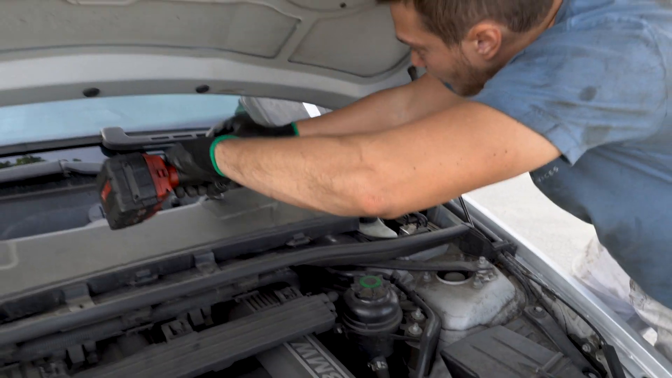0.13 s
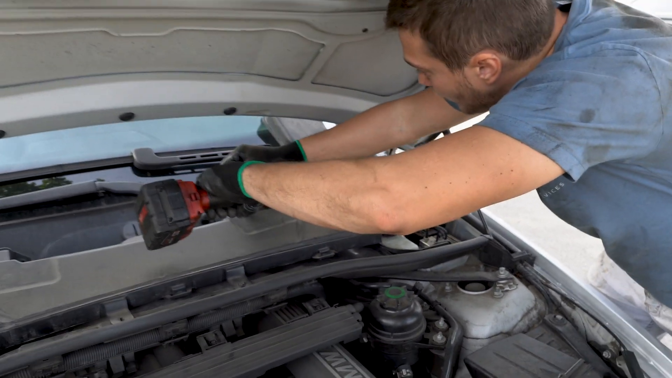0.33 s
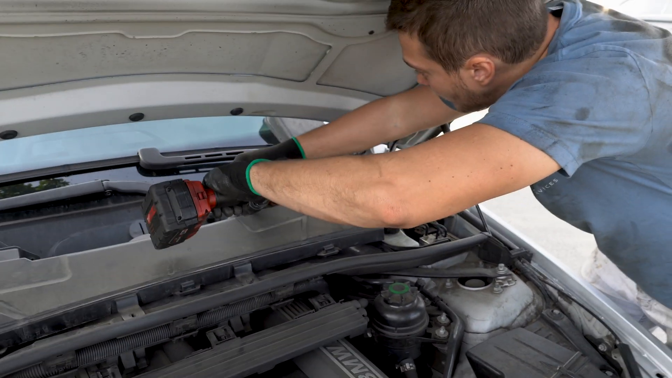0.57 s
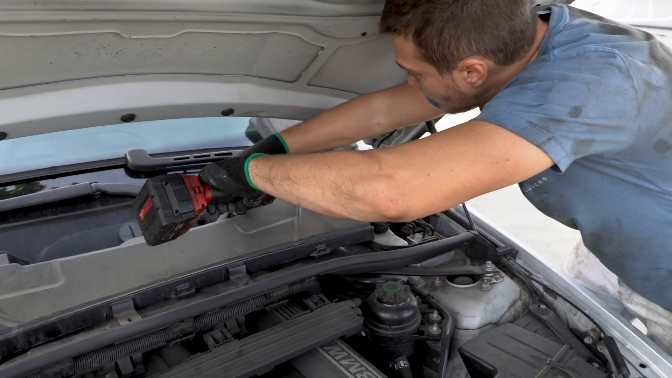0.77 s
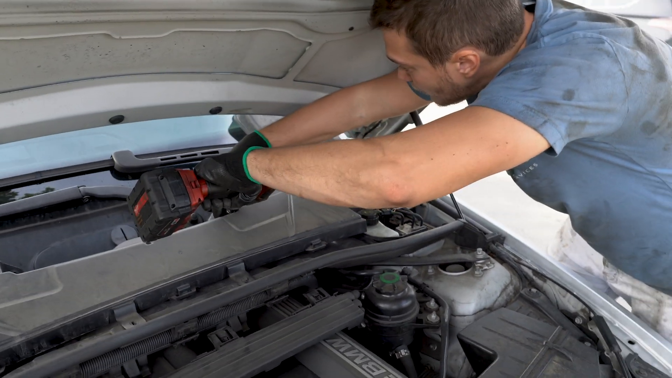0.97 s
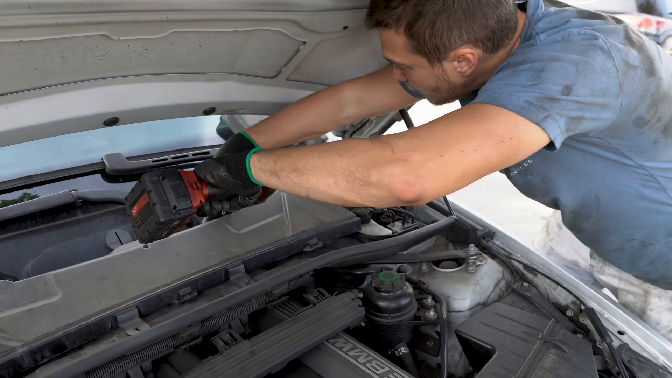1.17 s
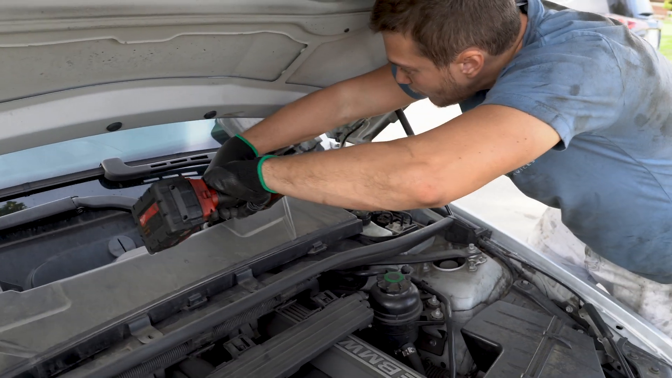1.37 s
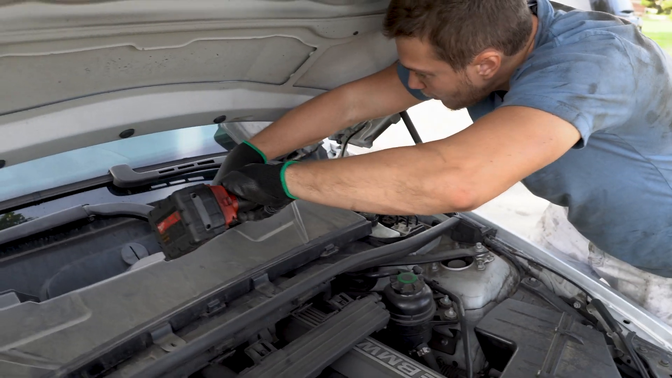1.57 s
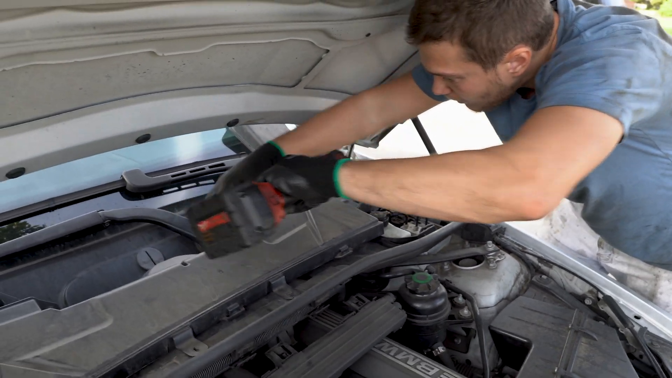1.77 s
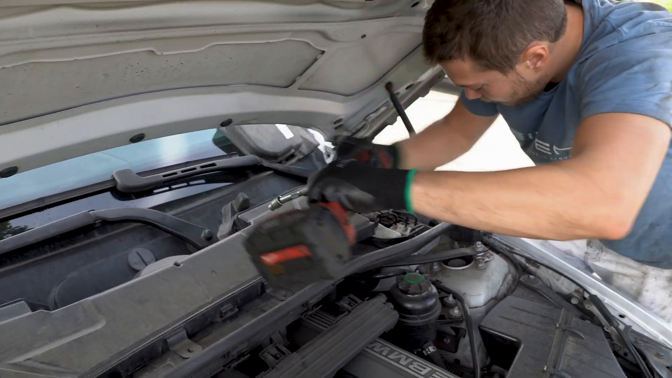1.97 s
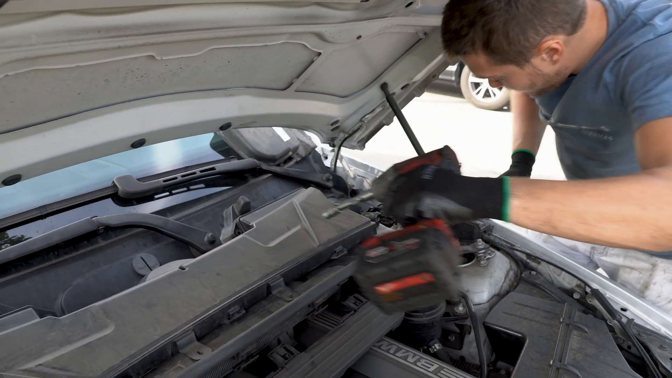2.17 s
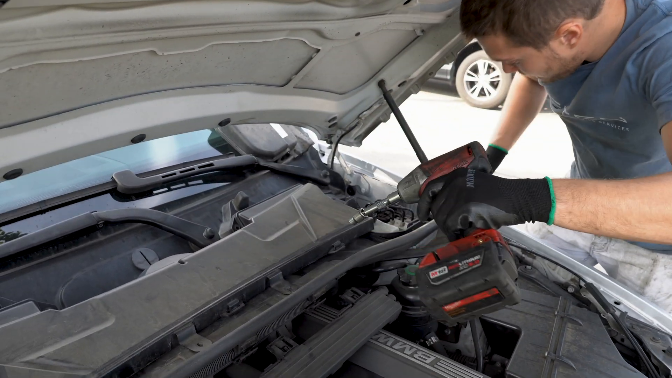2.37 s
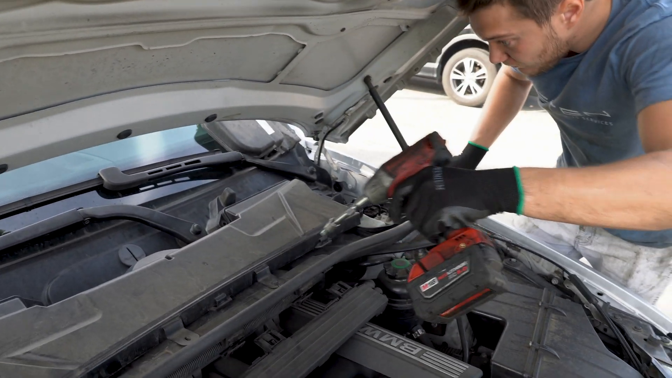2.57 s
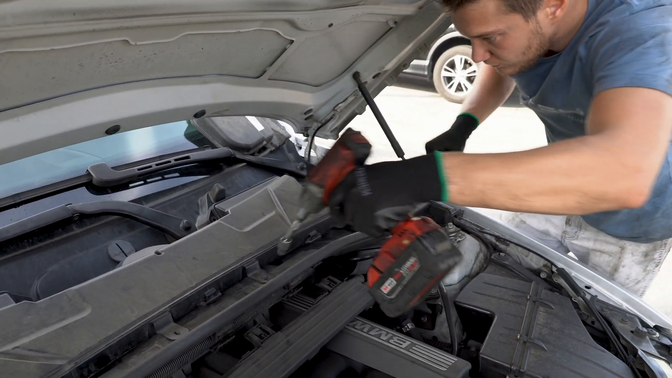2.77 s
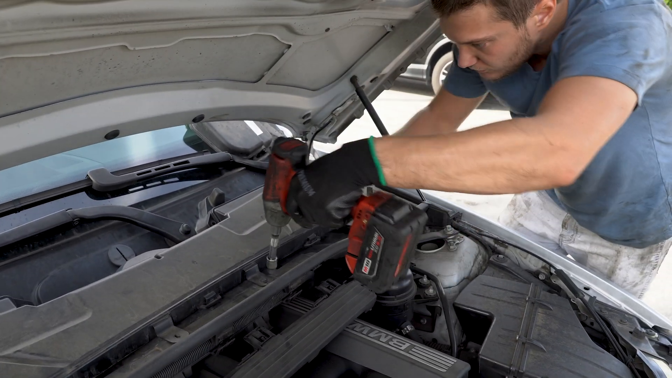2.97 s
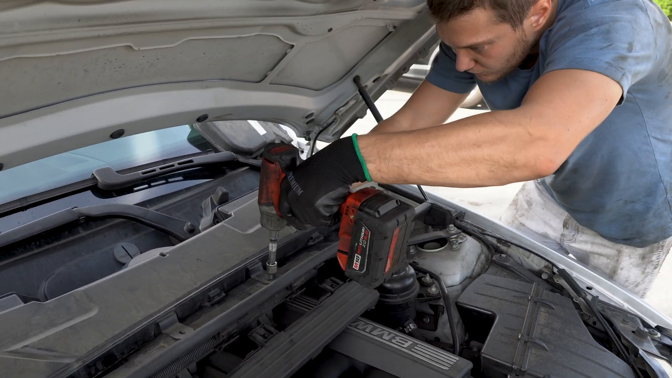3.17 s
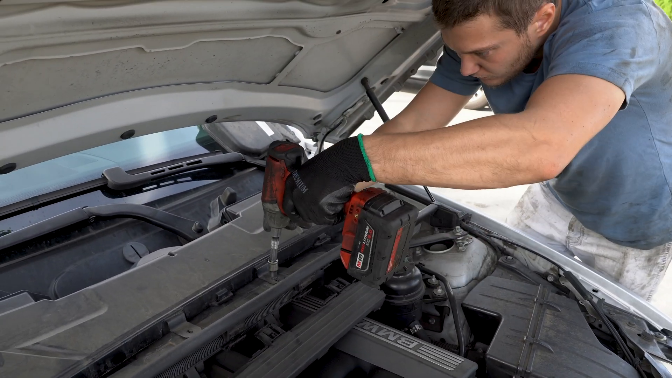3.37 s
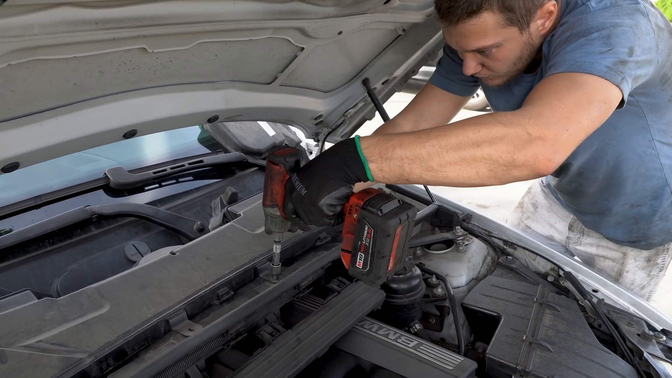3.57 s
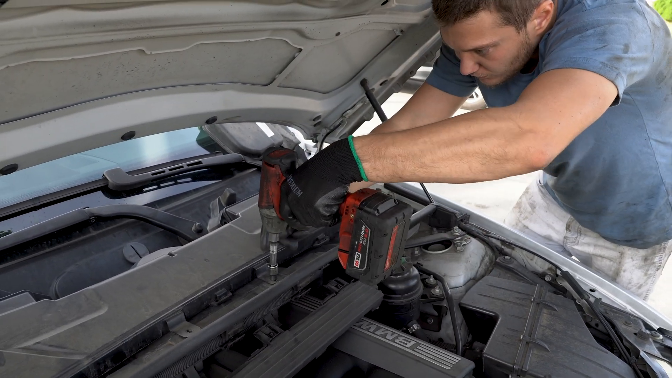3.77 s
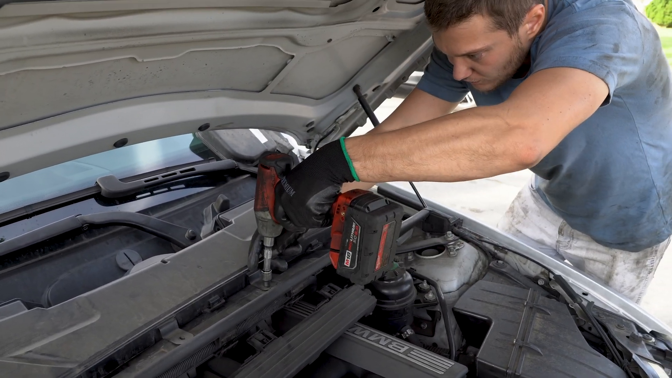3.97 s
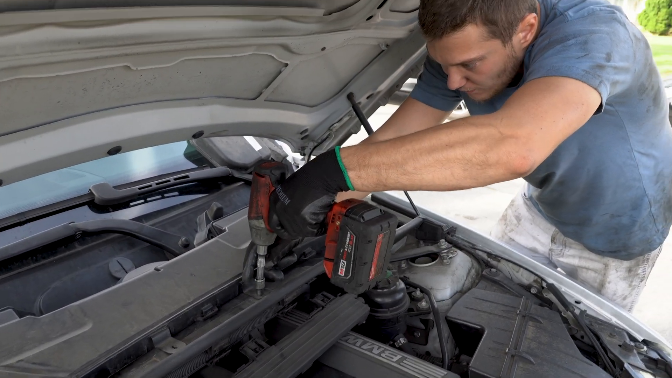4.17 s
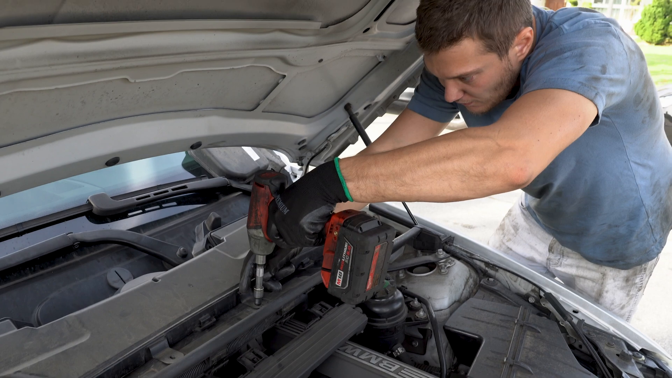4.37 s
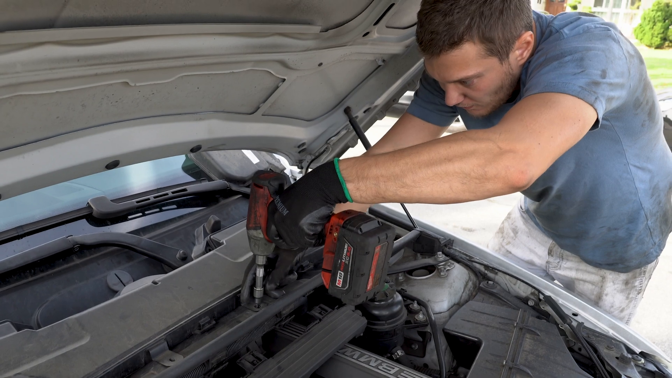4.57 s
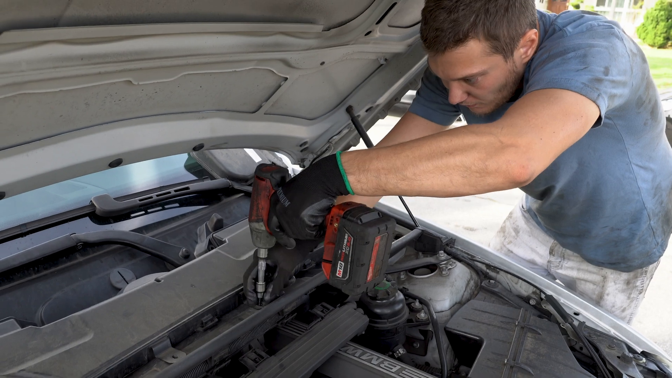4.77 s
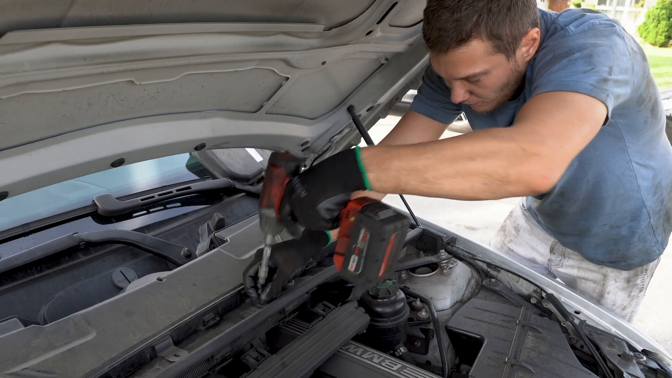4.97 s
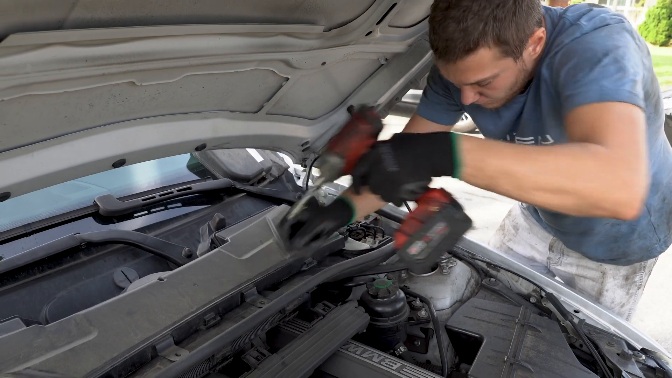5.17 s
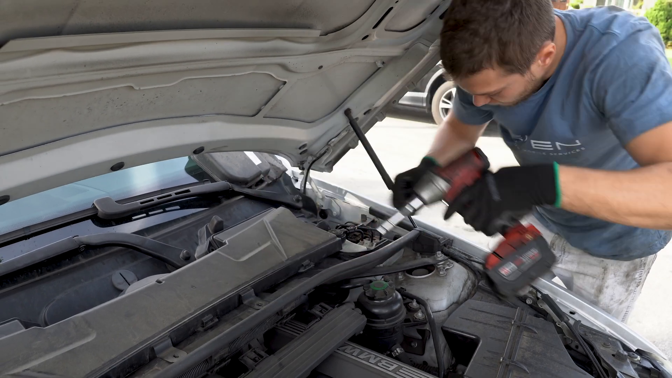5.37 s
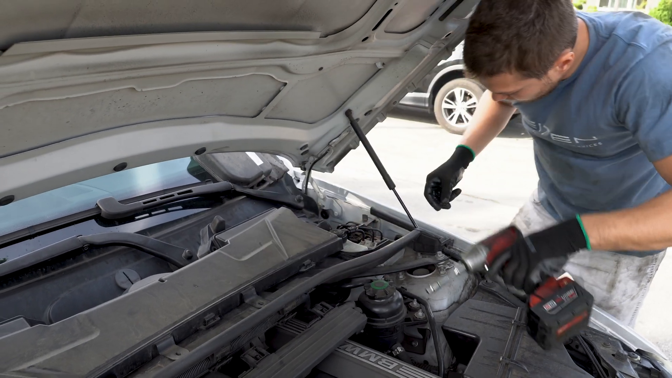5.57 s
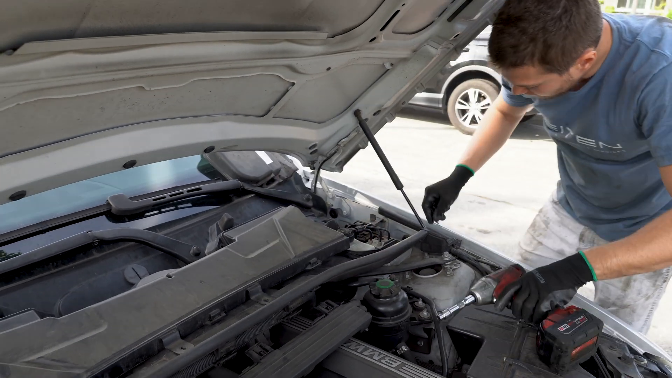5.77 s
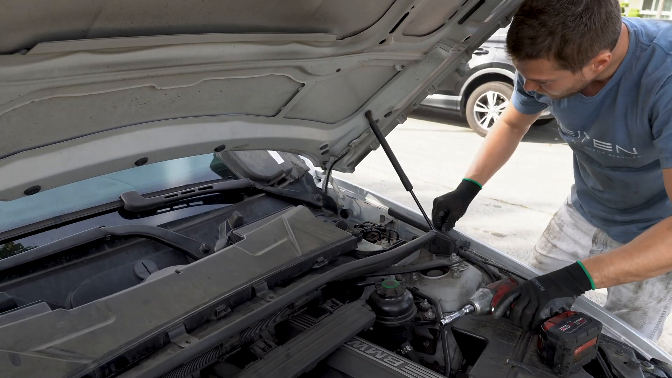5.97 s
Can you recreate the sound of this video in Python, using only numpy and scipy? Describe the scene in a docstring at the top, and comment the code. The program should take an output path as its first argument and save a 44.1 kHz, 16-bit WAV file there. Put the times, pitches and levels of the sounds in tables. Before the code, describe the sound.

A cordless electric ratchet spins out two small bolts in a car engine bay, heard from nearby. Hollow plastic knocks lead into the first whining, rattling run, which speeds up and shakes a cover. In the pause the tool snaps once and its socket clinks on a bolt head. The second run is briefer and opens with a loud metallic clink. Light ticks and sleeve rustles trail off over quiet outdoor rumble and distant hum.

```python
"""Under the open bonnet of a car, a cordless electric ratchet spins out two small bolts.
Its switched motor whistles near 10 kHz, the gears whine and rattle, and the loose bolt drives a plastic
cover into vibration. Impacts excite damped modes: the tool knocks on the cover and snaps once, and its
socket clinks on the bolt heads and ticks on its drive. The engine bay adds short reflections.
Behind lie outdoor rumble, a faint machine hum and the brushing of cloth."""
import sys
import numpy as np
from scipy import signal
from scipy.fft import rfft, irfft, next_fast_len
from scipy.io import wavfile
from scipy.ndimage import uniform_filter1d

SR = 44100
rng = np.random.default_rng(int(sys.argv[2]) if len(sys.argv) > 2 else 0)


def log_audio(samples):
    """Write samples as a 16-bit WAV file to the path given in sys.argv[1]."""
    # one column per channel
    frames = np.atleast_2d(samples).T
    # limit to full scale, then quantise
    limited = np.clip(frames, -1, 1)
    pcm = np.round(limited * 32767).astype(np.int16)
    wavfile.write(sys.argv[1], SR, pcm)


N = 265570
TIME = np.arange(N) / SR

# one run per bolt, levels referred to full speed and the moment of release:
# pull t/s, release t/s, cover level/dB, its drift/(dB/s), rattle level/dB, whine level/dB, whistle level/dB
BOLT_RUNS = [(0.828, 1.472, -29.5, 0.5, -38.7, -39.5, -35.3), (4.327, 4.785, -38.5, -18, -35, -39, -29.5)]
# the motor speeds up as the trigger goes deeper or the bolt frees: t/s, new electrical rate/Hz, lag/s
MOTOR_STEPS = [(.838, 157, .024), (1.165, 240, .04), (1.275, 303, .06), (4.331, 272, .028),
               (4.41, 328, .18)]
# whistle lines: offset from the switching tone/electrical rate, level/dB, wavering/dB
WHISTLE_SIDEBANDS = [(-4, -20.5, 3), (-2, 0, 1.3), (1, -25, 2), (2, -10, 3.5), (4, -31, 2)]
# motor and gear-mesh tones: f/electrical rate, level/dB
WHINE_ORDERS = [(3.15, -7), (6, -2), (7, -9), (8, 0), (9.45, -2), (10, -1), (12.6, -5), (14, -10),
                (15.75, -9), (18.9, -7), (22, -13), (25.2, -10)]
# peaks and a narrow notch that the whine and whistle glide through: f/Hz, half width/Hz, gain/dB
PEAKS_AND_NOTCH = [(1940, 80, 3), (2400, 120, 6), (2950, 90, 4), (3220, 90, 5), (3900, 70, 5),
                   (8780, 70, 8), (10570, 22, -12)]
# spectral densities of gear rattle, shaken cover and outdoor rumble: f/Hz, relative level/dB
RATTLE_SPECTRUM = [(200, -25.5), (700, -5.5), (1450, 0), (1700, -2.5), (2300, -4.5), (3000, 1),
                   (3600, -4.5), (5800, -7), (7000, -13), (8000, -8.5), (9000, -5), (11000, -17.5),
                   (14000, -17), (16000, -30)]
COVER_SPECTRUM = [(70, -29), (120, -4.5), (160, 8), (235, -2), (330, -8), (480, 0), (680, -16), (950, -8),
                  (1450, -22.5), (2200, -20.5), (5000, -48)]
AIR_SPECTRUM = [(15, -0.5), (28, -4), (44, -9), (100, -9), (200, -18.5), (330, -23.5), (500, -22),
                (1030, -25), (2530, -37.5), (8650, -50.5), (11000, -57.5), (16000, -63.5)]
# normal modes of plastic cover, socket and tool housing: f/Hz, level/dB, t60/s
COVER_MODES = [(156.8, 6, 0.097), (300, -2.5, 0.12), (371, -2, 0.054), (445, -1.5, 0.097),
               (638, 2.5, 0.043), (722, -2.5, 0.065), (866, -2, 0.069), (1024, -4, 0.051),
               (1123, -4, 0.033), (1450, -8, 0.045)]
SOCKET_MODES = [(168, 2, .18), (440, -4.5, 0.095), (511.4, -2, 0.18), (842, -9.5, 0.13), (1112, -5, 0.06),
                (1358, -5.5, .07), (1502, -1, 0.044), (1990, -12, 0.094), (2128, 0.5, 0.037),
                (2390, -4, 0.064), (2828, 0.5, .07), (2980, -6.5, 0.077), (3570, -2.5, .06),
                (3960, -10.5, .06), (4425, -12, 0.078)]
HOUSING_MODES = [(321, -6.5, 0.16), (543, -32, 0.131), (830, -16, .18), (915, -8, 0.3), (1133, -4, 0.071),
                 (1665, -5, .12), (1990, -3, 0.2), (2080, 0.5, 0.18), (2340, -6, 0.24), (2960, 6, 0.11),
                 (3030, -5, 0.161), (3580, 8.5, 0.07), (3960, -7.5, 0.139), (4770, -8, 0.11)]
# the four bands of a blow (thud, body, crack, tick): lower f/Hz, upper f/Hz
BLOW_BANDS = [(110, 380), (380, 1600), (1600, 5500), (5500, 16000)]
# tool and bolt strike the cover: t/s, body level/dB, relative thud/dB, relative crack/dB, cutoff f/Hz
COVER_KNOCKS = [(0.188, -24.5, -13, -19, 10000), (0.288, -49, -12, -28, 1100),
                (0.325, -33.5, -8.5, -30, 7000), (0.367, -42, -5, -34, 980), (0.4285, -25, -13, -20, 9000),
                (0.463, -24.5, -1, -16, 9800), (0.8317, -24, -1, -5, 13500),
                (0.8645, -23.5, -4, -7.5, 14000), (0.987, -38, 7, -22, 2520),
                (1.111, -31.5, -1.5, -14, 2480), (1.231, -38.5, 7.5, -12, 2500),
                (1.301, -37.5, 5, -3.5, 2510), (1.383, -32.5, -8, -14, 2500), (1.44, -28, 2.5, -17, 2500),
                (3.0585, -50.5, -9, -10.5, 4970), (3.266, -51, -12, -8.5, 6040),
                (5.802, -46, -10, -6.5, 7960), (5.829, -33.5, -1, -18, 754)]
# socket strikes bolt head: t/s, crack level/dB, relative thud/dB, relative tick/dB, t60/s, cutoff f/Hz
SOCKET_CLINKS = [(1.505, -41, 0.5, -25, 0.077, 9050), (1.532, -53, 12.5, 10, 0.033, 13200),
                 (1.56, -46, -2.5, 0.5, 0.077, 12100), (3.554, -29, -23, -16.5, 0.041, 7340),
                 (3.5819, -38.5, -4, -23, 0.054, 6000), (3.5921, -38, -5.5, -17, 0.021, 7200),
                 (3.601, -29, -9, -18.5, 0.031, 7300), (3.688, -43.5, 16.5, -12, .13, 9000),
                 (3.6977, -35, 4, 1.5, 0.049, 7440), (4.377, -22, -4, -3.5, 0.099, 14520),
                 (4.384, -16.5, -12, -6.5, 0.044, 11300), (4.4059, -30, 1.5, -4.5, .016, 9450),
                 (4.997, -52.5, -2.5, -9, 0.022, 7500)]
# catch, blow and rebound of a metal snap in the tool: t/s, level/dB, t60/s
SNAP_BLOWS = [(2.6508, -41, 0.022), (2.655, -21, .15), (2.6855, -31, 0.098)]
# light contacts from play in the drive: t/s, level/dB
DRIVE_TICKS = [(0.091, -60), (0.777, -58), (2.262, -55.5), (4.076, -62.5), (4.875, -52), (5.037, -58),
               (5.884, -65)]
# partials of a distant machine: f/Hz, rms level/dB
HUM_PARTIALS = [(86.3, -55.5), (172.6, -68), (260, -67.5), (345, -63), (431.5, -72.5), (520, -75),
                (866, -73)]
# gloves and sleeves brush past: t/s, half length/s, level/dB
CLOTH_BRUSHES = [(0.023, 0.03, -60), (1.78, 0.053, -63.5), (2.463, 0.36, -66.5), (4.998, 0.11, -60.5),
                 (5.36, 0.11, -61.5), (5.916, 0.12, -64)]

SWITCHING_HZ, FULL_SPEED_HZ = 9942, 300  # full speed is an electrical rate
COAST_S, COAST_SLOWING = .066, .5  # run-on after release, share of speed lost in it
START_S, STOP_S, WHISTLE_ATTACK_S = 0.013, 0.022, 0.012  # fades of the gears and cover; whistle onset
SHAKE_RISE_DB, RATTLE_RISE_DB, WHISTLE_RISE_DB = 13.5, 1, 6.5  # per doubling of speed
STRAIN_RATTLE_DB, STRAIN_WHINE_DB = 5, -24  # under strain the teeth chatter in their play, and tones fade
WHINE_DB_PER_S = 13.5  # the gear tones come through as the thread frees


def ratchet(pull, release, shake_db, drift_db_per_s, rattle_db, whine_db, whistle_db):
    """Forced vibration follows the motor's speed; on release the whistle stops while the gears coast."""
    asked_hz, hz = motor_speed(pull, release)
    cycles = np.cumsum(hz * (1 + .002 * walk(25))) / SR
    powered = (TIME > pull) & (TIME < release)
    age = np.maximum(TIME - pull, 0)
    to_go = release - np.clip(TIME, pull, release)
    turning = np.clip(age / START_S, 0, 1) * np.clip((release + COAST_S - TIME) / STOP_S, 0, 1)
    speed_oct, asked_oct = np.log2(np.maximum([hz, asked_hz], 1) / FULL_SPEED_HZ)
    strain = (asked_hz - hz) / FULL_SPEED_HZ

    def at_level(layer, db):
        return layer / layer[powered].std() * undb(db)

    cover = at_level(cover_shaking(hz), shake_db + SHAKE_RISE_DB * speed_oct - drift_db_per_s * to_go)
    rattle = gear_rattle(hz, cycles, swell_db=2.8, reduction=20.5)
    rattle = at_level(rattle, rattle_db + RATTLE_RISE_DB * asked_oct + STRAIN_RATTLE_DB * strain)
    whine = at_level(gear_whine(hz, cycles), whine_db - WHINE_DB_PER_S * to_go + STRAIN_WHINE_DB * strain)
    whistle = at_level(motor_whistle(hz, cycles), whistle_db + WHISTLE_RISE_DB * asked_oct)
    whistle *= 1 - np.exp(-age / WHISTLE_ATTACK_S)
    return (cover + rattle + whine) * turning + whistle * uniform_filter1d(powered * 1., size=400)


def motor_speed(pull, release):
    """First-order lag: the rate reached trails each step in the rate asked for, and falls after release."""
    asked_hz, hz, last_hz = np.zeros(N), np.zeros(N), 0
    for start, new_hz, lag in MOTOR_STEPS:
        if pull - .1 < start < release:
            asked_hz += (new_hz - last_hz) * (TIME > (start if last_hz else pull))
            hz += (new_hz - last_hz) * (1 - np.exp(-np.maximum(TIME - start, 0) / lag))
            last_hz = new_hz
    coasted = np.clip((TIME - release) / COAST_S, 0, 1)
    return uniform_filter1d(asked_hz, size=512), hz * (1 - COAST_SLOWING * coasted ** 2)


def motor_whistle(hz, cycles):
    """Modulation: the switched motor current sings in sidebands that spread as the speed rises."""
    return sum(undb(db + tone_gain_db(SWITCHING_HZ + k * hz) + waver_db * walk(20))
               * np.sin(2 * np.pi * (SWITCHING_HZ * TIME + k * cycles))
               for k, db, waver_db in WHISTLE_SIDEBANDS)


def gear_whine(hz, cycles):
    """Periodic forcing: motor and gear mesh sound at fixed multiples of the speed."""
    return sum(undb(db + tone_gain_db(k * hz) + 2.5 * walk(25)) * np.sin(2 * np.pi * k * cycles)
               for k, db in WHINE_ORDERS)


def tone_gain_db(hz):
    """Frequency response: peaks and a narrow notch make the gliding tones swell and briefly fade."""
    return sum(db * np.exp(-((hz - centre) / width) ** 2) for centre, width, db in PEAKS_AND_NOTCH)


def gear_rattle(hz, cycles, swell_db, reduction):
    """Backlash: teeth click through their play and ring the socket, swelling once per socket turn."""
    teeth = impacts(9 * hz + 200, scatter_db=2.0) + 0.07 * rng.standard_normal(N)
    swell = undb(swell_db * np.cos(2 * np.pi * cycles / reduction) + 0.97 * walk(70))
    response = ring(SOCKET_MODES[3:], np.arange(SR // 10) / SR, longest_t60=.06)
    ringing = signal.fftconvolve(teeth, response)[:N]
    return (colour(teeth, RATTLE_SPECTRUM) + undb(-17) * unit(ringing)) * swell


def cover_shaking(hz):
    """Random impact excitation: the wobbling bolt taps the plastic cover, which rumbles and rings."""
    taps = impacts(0.87 * hz + 50, scatter_db=0)
    rumble = colour(taps + 0.022 * rng.standard_normal(N), COVER_SPECTRUM)
    response = ring(COVER_MODES, np.arange(SR // 5) / SR, longest_t60=0.03)
    ringing = signal.fftconvolve(taps, response)[:N]
    return rumble + undb(-9.5) * unit(ringing)


def cover_knocks(t60=.043, tick_db=-9):
    """Contact shapes the spectrum: a heavy push on the cover adds thud, a hard hit crack and tick."""
    rows = [(start, db + thud, db, db + crack, db + crack + tick_db, t60, cutoff_hz)
            for start, db, thud, crack, cutoff_hz in COVER_KNOCKS]
    return blows(rows, COVER_MODES, dense_db=4, hold=2.23, damping=0.54, rise_s=0.00095, hardness=0.95)


def socket_clinks(body_db=3, body_share=.55):
    """Metal impact: a socket seating firmly adds thud and hollow body, a square hit a bright tick."""
    rows = [(start, db + thud, db + body_db + body_share * thud, db, db + tick, t60, cutoff_hz)
            for start, db, thud, tick, t60, cutoff_hz in SOCKET_CLINKS]
    return blows(rows, SOCKET_MODES, dense_db=2.5, hold=1.23, damping=.4, rise_s=0.00057, hardness=1.4)


def housing_snap(band_db=(-26.5, -9, -1, -3.5), cutoff_hz=9600):
    """Impulse response: the snap and its rebound ring the modes of the tool's housing."""
    rows = [(start, *np.add(db, band_db), t60, cutoff_hz) for start, db, t60 in SNAP_BLOWS]
    return blows(rows, HOUSING_MODES, dense_db=5.5, hold=1.9, damping=0.51, rise_s=0.00022, hardness=4.1)


def drive_ticks(band_db=(1, -4, 0.5, -3), t60=0.038, cutoff_hz=11700):
    """Mechanical clearance: the loose socket strikes its drive with a thin tick."""
    rows = [(start, *np.add(db, band_db), t60, cutoff_hz) for start, db in DRIVE_TICKS]
    return blows(rows, SOCKET_MODES, dense_db=11, hold=1.5, damping=0.54, rise_s=0.00017, hardness=1.7)


def blows(rows, modes, dense_db, hold, damping, rise_s, hardness):
    """Modal superposition: a blow rings the main modes and a dense crowd whose treble dies first."""
    out, t = np.zeros(N + SR), np.arange(SR // 4) / SR
    for start, *band_levels, t60, cutoff_hz in rows:
        tones = ring(modes, t, longest_t60=hold * t60)
        for (lo, hi), db in zip(BLOW_BANDS, band_levels):
            band_t60 = t60 * (np.sqrt(lo * hi) / 2000) ** -damping
            burst = rng.standard_normal(len(t)) * undb(-60 * t / band_t60) * (1 - np.exp(-t / rise_s))
            burst = lowpass(burst, lo * hardness, order=1)  # a softer contact leaves out the top
            crowd = unit(bandpass(burst, lo, hi))
            part = undb(dense_db) * crowd * np.sqrt(hi / 5500)  # modal density rises with frequency
            if any(lo < hz < hi for hz, _, _ in modes):
                part += unit(bandpass(tones, lo, hi))
            part = unit(lowpass(part, cutoff_hz, order=4))
            # the level is the rms that this energy would have over 20 ms
            out[int(start * SR):][:len(t)] += part * np.sqrt(.02 / t[-1]) * undb(db)
    return out[:N]


def ring(modes, t, longest_t60):
    """Free vibration: slightly detuned modes decay exponentially; the grip limits their decay time."""
    return sum((-1) ** k * undb(db - 60 * t / min(t60, longest_t60))
               * np.sin(2 * np.pi * hz * (1 + 0.0082 * rng.standard_normal()) * t)
               for k, (hz, db, t60) in enumerate(modes))


def engine_bay(x, t60, wet_db, cutoff_hz):
    """Reverberation: short, dense reflections between the bonnet and the engine."""
    t = np.arange(SR // 2) / SR
    envelope = undb(-60 * t / t60) * (1 - np.exp(-t / 0.0068))
    echoes = lowpass(rng.standard_normal(len(t)) * envelope, cutoff_hz, order=2)
    return x + undb(wet_db) * signal.fftconvolve(x, echoes / np.linalg.norm(echoes))[:N]


def outdoor_rumble():
    """Broadband noise, strongest in the bass, wanders slightly in level."""
    return colour(rng.standard_normal(N), AIR_SPECTRUM) * undb(-47.5 + 0.43 * walk(4.4))


def machine_hum():
    """A near-harmonic series from a distant machine wavers in amplitude and phase."""
    return sum(undb(db + 2 * walk(3.2)) * unit(np.sin(2 * np.pi * hz * TIME + 0.36 * walk(4.5)))
               for hz, db in HUM_PARTIALS)


def cloth_brushing():
    """Friction noise: gloves and sleeves brush past in soft, grainy swells."""
    swells = sum(undb(db) * np.exp(-((TIME - centre) / width) ** 2) for centre, width, db in CLOTH_BRUSHES)
    grain = rng.standard_normal(N) * undb(3.1 * walk(120))
    return swells * colour(grain, [(300, -7), (1500, 2), (4000, -5.5), (9000, -8), (15000, -23.5)])


def impacts(rate_hz, scatter_db):
    """Poisson process: independent clicks with a spread in level."""
    hits = rng.random(N) < rate_hz / SR
    return hits * rng.choice([-1, 1], N) * undb(scatter_db * np.clip(rng.standard_normal(N), -2, 2))


def walk(rate_hz):
    """Smooth random fluctuation of rms 1."""
    step = max(int(SR / rate_hz), 2)
    stairs = np.repeat(rng.standard_normal(N // step + 1), step)
    return unit(uniform_filter1d(stairs, step)[:N])


def colour(x, points):
    """Spectral shaping by points of f/Hz, level/dB; the result has rms 1."""
    hz, db = np.transpose(points)
    size = next_fast_len(N)
    f = np.maximum(np.fft.rfftfreq(size, 1 / SR), 1)
    gain = undb(np.interp(np.log(f), np.log(hz), db))
    return unit(irfft(rfft(x, size) * gain, size)[:N])


def bandpass(x, lo_hz, hi_hz):
    """Causal band-pass."""
    return signal.sosfilt(signal.butter(4, [lo_hz, hi_hz], "band", fs=SR, output="sos"), x)


def lowpass(x, hz, order):
    """Causal low-pass."""
    return signal.sosfilt(signal.butter(order, min(hz, .45 * SR), fs=SR, output="sos"), x)


def undb(db):
    """Decibels to amplitude ratio."""
    return 10 ** (np.asarray(db) / 20)


def unit(x):
    """Normalisation to rms 1."""
    return x / np.sqrt(np.mean(x ** 2) + 1e-20)


def scene():
    """Superposition: tool, cover and bolts sound in the engine bay, over the background."""
    work = sum(ratchet(*run) for run in BOLT_RUNS)
    work += cover_knocks() + socket_clinks() + drive_ticks() + housing_snap()
    in_bay = engine_bay(work, t60=0.2, wet_db=-21.5, cutoff_hz=8000)
    return (in_bay + outdoor_rumble() + machine_hum() + cloth_brushing())[None]


def record(dry):
    """Soft saturation rounds the loudest peak; a steep low-pass cuts the top."""
    ceiling, cutoff_hz = .92, 16100
    rounded = dry / (1 + (dry / ceiling) ** 8) ** (1 / 8)
    return signal.sosfilt(signal.ellip(10, .2, 80, cutoff_hz, fs=SR, output="sos"), rounded)


dry = scene()
out = record(dry)
log_audio(out)
```